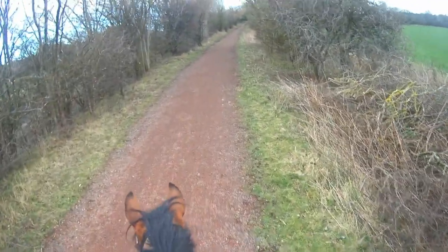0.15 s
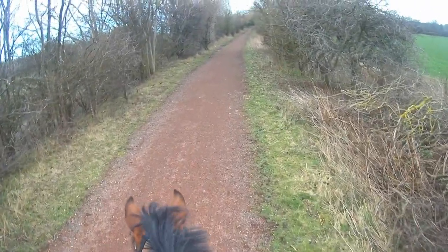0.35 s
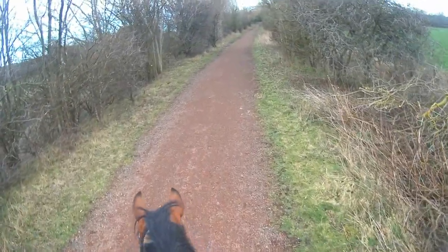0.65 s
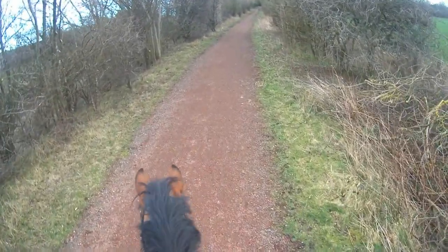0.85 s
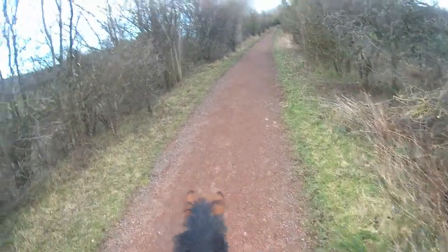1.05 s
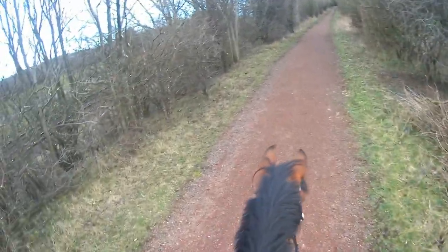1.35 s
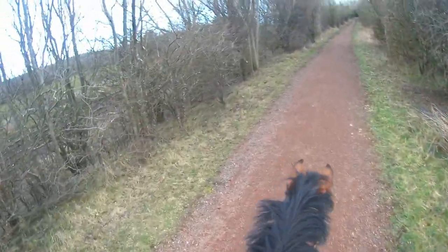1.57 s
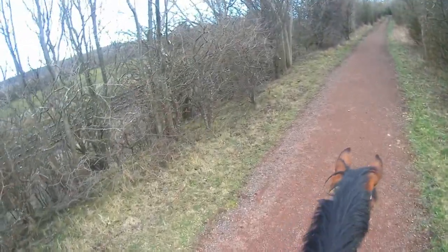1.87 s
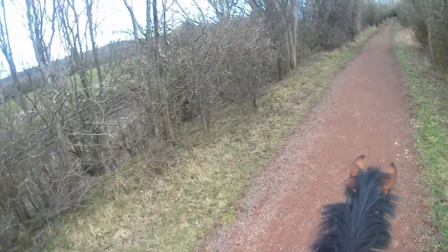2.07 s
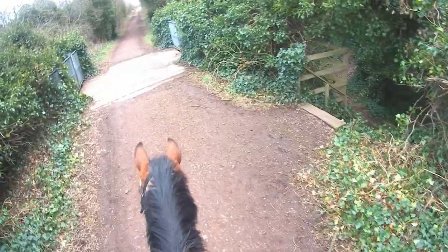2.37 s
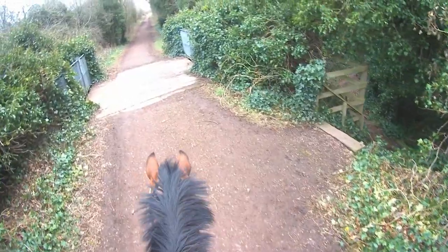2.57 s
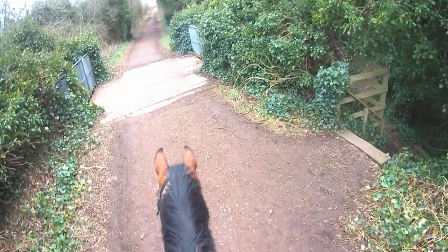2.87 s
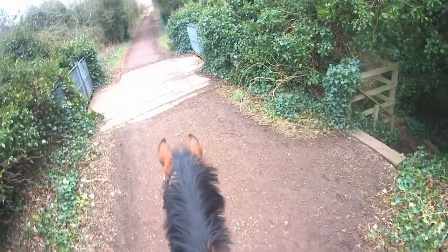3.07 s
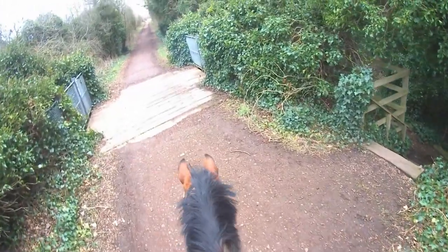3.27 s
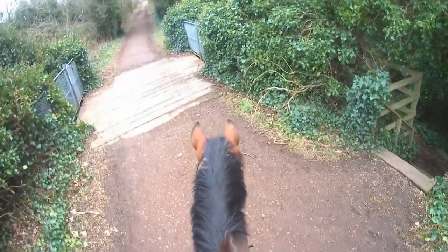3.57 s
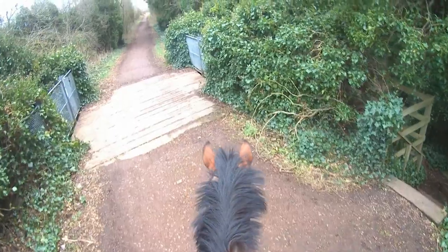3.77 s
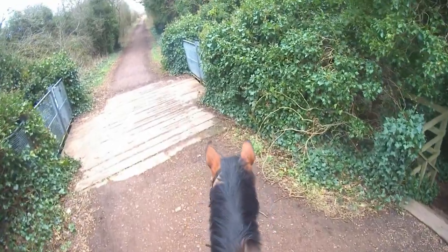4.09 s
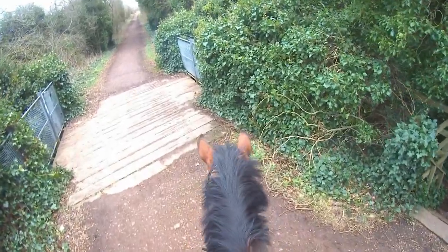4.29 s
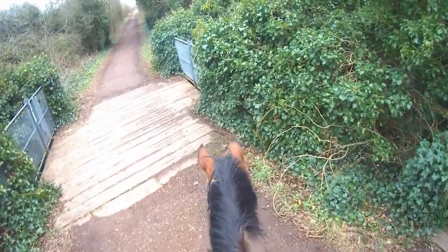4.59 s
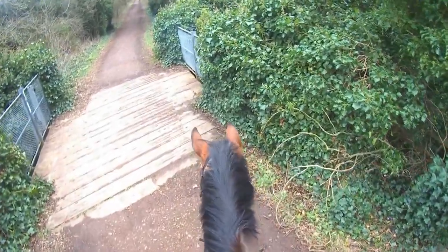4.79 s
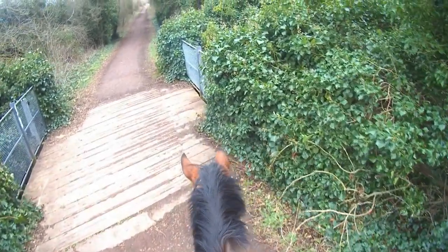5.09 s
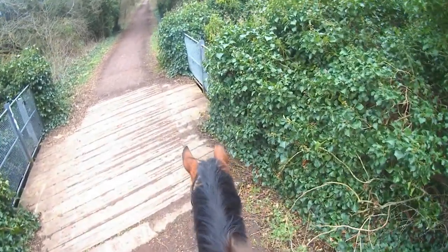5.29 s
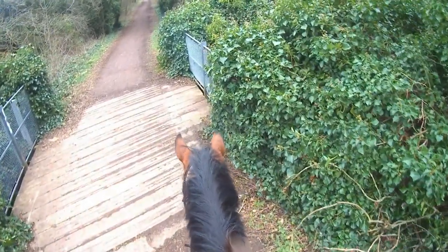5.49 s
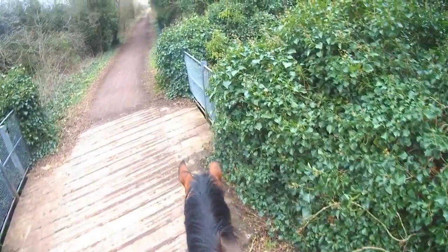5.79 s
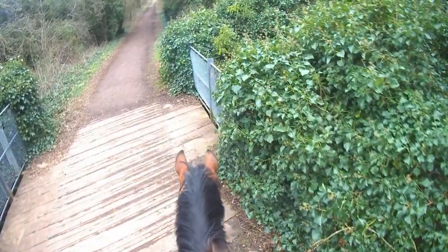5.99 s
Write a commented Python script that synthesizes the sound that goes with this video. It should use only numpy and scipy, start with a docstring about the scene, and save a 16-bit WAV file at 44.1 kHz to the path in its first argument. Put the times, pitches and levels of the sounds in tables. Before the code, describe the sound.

Heard from the saddle outdoors, a horse walks over gravel. Light, uneven hollow knocks come singly or in small clusters, each with a little grit. Deep wind rumble and short gusts buffet a small cased microphone, strongest at the start, over a steady hollow hiss. A dull bump on the case and one thin click pass early, then loose stones tick more clearly.

```python
"""A breeze with short gusts rumbles on a small cased microphone, whose cavity makes a steady hiss hollow.
Under it a horse walks along a gravel path, heard from the saddle: each hoof lands as one or a few short
hollow knocks (damped modes) with a little grit (random clicks) after them, and loose stones tick and slide.
A bump on the case and one thin dry click sound once each. The recorder runs at a low sample rate and mirrors
faint images into the treble."""
import sys
import numpy as np
from scipy import signal
from scipy.fft import rfft, irfft, next_fast_len
from scipy.io import wavfile
from scipy.ndimage import uniform_filter1d

SR = 44100
rng = np.random.default_rng(int(sys.argv[2]) if len(sys.argv) > 2 else 0)


def file_out(sig):
    """Save sig as 16-bit WAV at sys.argv[1]."""
    # one column per channel
    cols = np.atleast_2d(sig).T
    # limit, then scale
    lim = np.clip(cols, -1, 1)
    pcm = np.round(lim * 32767).astype(np.int16)
    wavfile.write(sys.argv[1], SR, pcm)


N = 271161
TIME = np.arange(N) / SR   # seconds

# All spectra below: (frequency [Hz], relative density [dB per Hz])
# slow pressure sway of the wind
SWAY_SPECTRUM = [(2, -5.5), (6, 6.5), (17, -1), (24, -22), (40, -36)]
# eddies buffeting the case
BUFFET_SPECTRUM = [(16, -30.5), (26, 0), (42, 6), (55, -11.5), (72, -17), (95, -34), (200, -49.5)]
# how fast the breeze swells and lulls
FLUTTER_SPECTRUM = [(1.5, -10.5), (4, 6), (10, -4.5), (28, -2.5)]
# low rush of air
RUSH_SPECTRUM = [(25, -24), (60, 6), (100, -1), (170, -3), (210, -7.5), (330, -11.5), (500, -19),
                 (900, -26), (2000, -51)]
# hiss made hollow by the cavity of the case
HISS_SPECTRUM = [(150, -8), (450, -1.5), (750, -2.5), (1080, -0.5), (1260, -5.5), (1430, 6), (1540, -0.5),
                 (1720, -8.5), (2000, -9), (2500, -12), (3300, -13), (3900, -19)]
# sliding gravel
GRAVEL_SPECTRUM = [(300, -25.5), (850, -35), (1500, 0.5), (2200, -9), (3900, 25)]

# breeze between gusts, before its trim: (time [s], level [dB])
BREEZE_CURVE = [(0, -26), (.2, -23.5), (.55, -31.5), (1.1, -34), (2.05, -36), (2.27, -41.5), (2.9, -35.5),
                (3.9, -42), (4.35, -33.5), (5.15, -36.5), (5.6, -35.5), (6.15, -35)]
# short gusts that swell and fall evenly: (crest time [s], level [dB], half length [s])
GUSTS = [(0.025, -16, 0.035), (0.276, -12, 0.012), (0.826, -27.5, .025), (0.988, -24.5, 0.085),
         (1.466, -24.5, 0.024), (1.938, -24, 0.086), (2.117, -14.5, 0.017), (2.42, -24.5, 0.025),
         (2.593, -28.5, 0.014), (3.041, -31, .06), (3.702, -26.5, 0.032), (4.239, -20, 0.043),
         (4.937, -25, 0.059), (5.439, -26.5, 0.014), (5.687, -30, 0.034)]
# low rush: (time [s], rms level [dB])
RUSH_CURVE = [(0, -42.5), (.55, -40), (.85, -44.5), (1.25, -40.5), (2.0, -41.3), (2.8, -43.5),
              (3.35, -42.5), (4.6, -43), (5.9, -44), (6.15, -37.5)]
# hollow hiss: (time [s], rms level [dB])
HISS_CURVE = [(0, -49), (2.0, -50.5), (2.8, -51), (3.4, -49), (4.2, -51.3), (4.8, -48.5), (5.4, -50),
              (6.15, -50.5)]
# loose stones ticking between the steps, louder on the later stretch of path: (time [s], rms level [dB])
STRAY_CURVE = [(0, -74.5), (2.3, -63.5), (2.9, -57.5), (4.3, -59.5), (4.8, -53.5), (5.4, -57), (6.15, -56)]

# short resonances that every blow rings: (frequency [Hz], width [Hz], gain [dB])
KNOCK_MODES = [(500, 350, -5.5), (1093, 123, -1), (1506, 84, 4), (2180, 490, -6), (3570, 410, -1)]
# hoof contacts: (time [s], relative level [dB], clop pitch [Hz], hard edge [dB])
HOOF_CONTACTS = [(0.028, -40, 1000, -13), (0.565, -32.5, 896, -14), (0.751, -34.5, 855, -23),
                 (1.155, -34.5, 1000, -6), (1.405, -31.5, 1010, -13), (1.413, -31.5, 840, -23),
                 (1.718, -36, 950, -2), (1.742, -33, 863, -16), (1.994, -42, 795, -17),
                 (2.067, -37, 840, -25), (2.204, -34, 1010, -10), (2.428, -22, 837, -21),
                 (2.457, -38, 856, -34), (2.749, -30.5, 1026, -21), (2.781, -32.5, 985, -29),
                 (2.797, -34, 1020, -1), (2.966, -39.5, 864, -23), (3.094, -39, 875, -25),
                 (3.114, -39, 950, -18), (3.387, -31.5, 1060, -30), (3.41, -31, 960, -22),
                 (3.414, -33.5, 1054, -26), (3.549, -32, 914, -12), (3.63, -33.5, 1030, -23),
                 (3.634, -30, 927, -27), (3.95, -34.5, 890, -13), (3.969, -31.5, 1044, -19),
                 (4.224, -31.5, 1014, -21), (4.23, -36, 1060, -20), (4.571, -40, 990, -15),
                 (4.648, -29, 974, -31), (4.694, -29.5, 1040, -30), (4.803, -28.5, 1040, -13),
                 (4.831, -31.5, 1120, -18), (5.3, -36.5, 1155, -10), (5.575, -39, 1020, -23),
                 (5.841, -37.5, 870, -19), (6.016, -40, 1070, -22), (6.08, -37, 1140, -13),
                 (6.11, -28.5, 1046, -10)]
# sharper clacks where a shoe meets a stone: (time [s], relative level [dB], pitch [Hz], hard edge [dB])
STONE_CLACKS = [(0.219, -28, 1550, -17), (2.7498, -39, 1590, 7), (3.3873, -27.5, 1380, -16),
                (3.6342, -33, 1330, -7), (4.6494, -41, 2040, -17), (4.6943, -44, 1510, -15),
                (4.8041, -46, 2000, 5)]
# dull bump on the case: (time [s], peak level [dB], pitch [Hz], ring t60 [s])
CASE_BUMPS = [(1.527, -25, 158, 0.047)]
# one thin dry click: (time [s], peak level [dB])
THIN_CLICKS = [(2.1894, -28)]
# hooves scuffing loose gravel: (time [s], relative level [dB], rise [s], decay t60 [s])
SCUFFS = [(2.20, -59, 0.0054, 0.27), (2.455, -58.5, 0.057, 0.77), (4.47, -63, 0.097, 0.62),
          (4.66, -64, 0.012, 0.21), (4.81, -62.5, 0.034, .5), (5.84, -49.5, .005, 0.069),
          (6.085, -53, 0.0067, 0.14)]

BREEZE_TRIM_DB, FLUTTER_DB = 0.5, 4   # trim on the breeze curve; depth of its random swells and lulls
SWAY_DB, SWAY_FOLLOWS = -19.5, 0.58   # sway in the mean wind; share of the wind's swing that it follows
STRAY_TICKS_PER_S = 110
CLOP_T60_S = 0.021   # ring of the hollow under a hoof
CLACK_T60_S, CLACK_GRIT_DB = 0.0082, -35
USUAL_BLOW_DB = -31
CONTACT_S = 0.00076   # contact time of the usual blow
CONTACT_DOUBLES_DB = 16   # a blow this much harder sinks in twice as long
GRIT_T60_S, LOADING_S = 0.25, 0.00066   # the grit settles; the weight takes a moment to bear on it
# grit against a fully hard blow; stonier ground gives both more edge and more grit [dB per dB]
GRIT_DB, GRIT_PER_EDGE = -33.5, 0.46
THUD_HZ, THUD_T60_S, THUD_DB = 190, 0.04, -15   # ground under a blow; level against the contact table
RECORDER_RATE_HZ, CUTOFF_HZ = 8000, 15700


def from_db(db):
    """Decibels to gain."""
    return 10 ** (np.asarray(db) / 20)


def rms_one(x):
    """Scale to unit rms."""
    return x / np.sqrt(np.mean(x ** 2) + 1e-20)


def level_curve(rows):
    """Gain at every sample, with straight lines in dB between the points."""
    s, db = np.transpose(rows)
    return from_db(np.interp(TIME, s, db))


def coloured(x, spectrum):
    """Give a steady noise a spectrum, silent outside its end points; rms 1."""
    hz, db = np.transpose(spectrum)
    size = next_fast_len(N)
    log_hz = np.log(np.fft.rfftfreq(size, 1 / SR) + 0.0011)   # the offset avoids log(0)
    gain = from_db(np.interp(log_hz, np.log(hz), db, left=-200, right=-200))
    return rms_one(irfft(rfft(x, size) * gain, size)[:N])


def noise(spectrum):
    """Smooth noise of a given colour; rms 1."""
    return coloured(rng.standard_normal(N), spectrum)


def evened(x, span_s):
    """Even out the chance swells of a low noise by its own running power."""
    size = max(int(span_s * SR), 2)
    power = uniform_filter1d(uniform_filter1d(x ** 2, size), size)
    return x / np.sqrt(power + 0.00086)


def resonance(x, hz, width_hz):
    """Two-pole band-pass with a gain of about 1 on top."""
    r = np.exp(-np.pi * width_hz / SR)
    zeros = np.array([1, 0, -1]) * (1 - r * r) / 2
    poles = [1, -2 * r * np.cos(2 * np.pi * hz / SR), r * r]
    return signal.lfilter(zeros, poles, x + 1e-18)


def struck(force, hz, t60, contact_q):
    """A damped mode behind a soft contact, so that it swells briefly before it dies."""
    softened = resonance(force, hz, hz / contact_q)
    return resonance(softened, hz, np.log(1000) / (np.pi * t60))


def grains(count, per_s, spread_db):
    """Random tiny clicks of uneven size and either sign; rms 1."""
    sizes = from_db(spread_db * np.minimum(rng.exponential(1, count), 4))
    signs = rng.choice([-1, 1], count)
    return rms_one(sizes * signs * (rng.random(count) < per_s / SR))


def add(out, s, sound):
    """Mix a sound in at a time."""
    at = max(round(s * SR), 0)
    out[at:at + len(sound)] += sound[:N - at]


def wind(top_hz=80):
    """Gusts ride on the breeze and drive deep buffeting eddies on the case; a slow sway grows with them."""
    sway = evened(noise(SWAY_SPECTRUM), span_s=.15)
    eddies = evened(noise(BUFFET_SPECTRUM), span_s=.06)
    flutter = from_db(BREEZE_TRIM_DB + FLUTTER_DB * noise(FLUTTER_SPECTRUM))
    breeze = level_curve(BREEZE_CURVE) * flutter
    gusts = sum(from_db(db) * np.exp(-((TIME - s) / half_s) ** 2) for s, db, half_s in GUSTS)
    strength = np.hypot(breeze, gusts)
    sway_gain = from_db(SWAY_DB) * (strength / strength.mean()) ** SWAY_FOLLOWS
    pressure = strength * eddies + sway_gain * sway
    return signal.sosfiltfilt(signal.butter(4, top_hz, fs=SR, output="sos"), pressure)


def air():
    """A low rush and a hiss that the cavity of the case makes hollow, both shaped noise."""
    rush = level_curve(RUSH_CURVE) * noise(RUSH_SPECTRUM)
    hiss = level_curve(HISS_CURVE) * noise(HISS_SPECTRUM)
    return rush + hiss


def knock(blow, grit, hz, t60, edge_db, contact_s, grit_in_clop_db=4.5):
    """The hollow under the hoof clops; hard edge and grit ring the knock modes; a long contact dulls it all."""
    clop = struck(blow + from_db(grit_in_clop_db) * grit, hz, t60, contact_q=1.29)
    hard = from_db(edge_db) * blow + grit
    edge = np.zeros(len(hard))
    for k, (mode_hz, width_hz, db) in enumerate(KNOCK_MODES):
        edge += (-1) ** k * from_db(db) * resonance(hard, mode_hz, width_hz)   # modes alternate in sign
    softening = signal.butter(2, min(1 / contact_s, SR / 4), fs=SR, output="sos")
    return signal.sosfilt(softening, clop - edge)


def stray_stones(hz=1000, t60=0.0058):
    """Kicked stones tick faintly at random, with the hollow colour of the knocks."""
    ticks = grains(N, per_s=STRAY_TICKS_PER_S, spread_db=0.5)
    return level_curve(STRAY_CURVE) * rms_one(knock(ticks, 0, hz, t60, edge_db=-7, contact_s=.0005))


def knocks(rows, t60, grit_db, level_db):
    """Each contact is one blow, then grit crushed under the hoof; harder blows sink in longer and sound duller."""
    out, t = np.zeros(N), TIME[:SR // 6]
    blow = signal.unit_impulse(len(t))
    crush = (1 - np.exp(-t / LOADING_S)) * from_db(grit_db - 60 * t / GRIT_T60_S)
    for s, db, hz, edge_db in rows:
        contact_s = CONTACT_S * 2 ** ((db - USUAL_BLOW_DB) / CONTACT_DOUBLES_DB)
        stones = grains(len(t), per_s=1400, spread_db=3.5)
        grit = stones * crush * from_db(GRIT_PER_EDGE * edge_db)
        # the peak of the blow without grit sets the level
        bare_peak = np.abs(knock(blow, 0, hz, t60, edge_db, contact_s)).max()
        strength = from_db(db + level_db) / bare_peak
        add(out, s, strength * knock(blow, grit, hz, t60, edge_db, contact_s))
    return out


def thuds():
    """The ground answers every hoof contact with a faint dull thud, one low damped mode."""
    out = np.zeros(N)
    thud = struck(signal.unit_impulse(SR // 6), THUD_HZ, THUD_T60_S, contact_q=0.26)
    for s, db, _, _ in HOOF_CONTACTS:
        add(out, s, from_db(db + THUD_DB) * thud / np.abs(thud).max())
    return out


def bump():
    """A soft blow on the case, one low damped mode."""
    out = np.zeros(N)
    for s, db, hz, t60 in CASE_BUMPS:
        thud = struck(signal.unit_impulse(SR // 6), hz, t60, contact_q=1.0)
        add(out, s, from_db(db) * thud / np.abs(thud).max())
    return out


def click(decay_s=0.0028):
    """One thin dry click: a sudden small step that dies away."""
    return sum((TIME > s) * from_db(db) * np.exp(-np.abs(TIME - s) / decay_s) for s, db in THIN_CLICKS)


def scuffs():
    """Small stones start to slide under a hoof, tick against each other and settle again."""
    slide = np.zeros(N)
    for s, db, rise_s, t60 in SCUFFS:
        rise = np.exp(np.minimum(TIME - s, 0) / rise_s)
        slide += rise * from_db(db - 60 * np.maximum(TIME - s, 0) / t60)
    stones = grains(N, per_s=1200, spread_db=3.5)
    return slide * coloured(stones, GRAVEL_SPECTRUM)


def scene():
    """Wind and air on the case, hooves and gravel below; one channel."""
    clops = knocks(HOOF_CONTACTS, CLOP_T60_S, GRIT_DB, level_db=4.0)
    clacks = knocks(STONE_CLACKS, CLACK_T60_S, CLACK_GRIT_DB, level_db=3.5)
    hooves = clops + clacks + thuds()
    return (wind() + air() + stray_stones() + hooves + bump() + scuffs())[None]


def record(dry):
    """Slow samples joined by straight lines mirror faint images into the treble; a click joins; the top is cut."""
    slow = signal.resample_poly(dry[0], RECORDER_RATE_HZ, SR, window=("kaiser", 5.0))
    joined = np.interp(TIME, np.arange(len(slow)) / RECORDER_RATE_HZ, slow)
    top_cut = signal.ellip(10, .1, 80, CUTOFF_HZ, fs=SR, output="sos")
    return signal.sosfilt(top_cut, joined + click())[None]


dry = scene()
out = record(dry)
file_out(out)
```